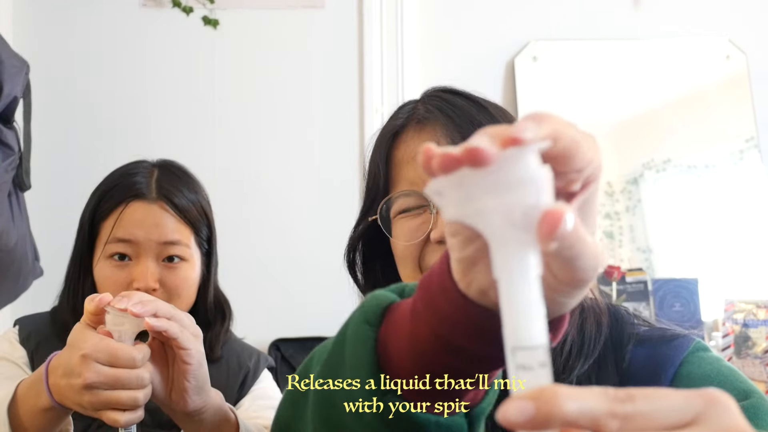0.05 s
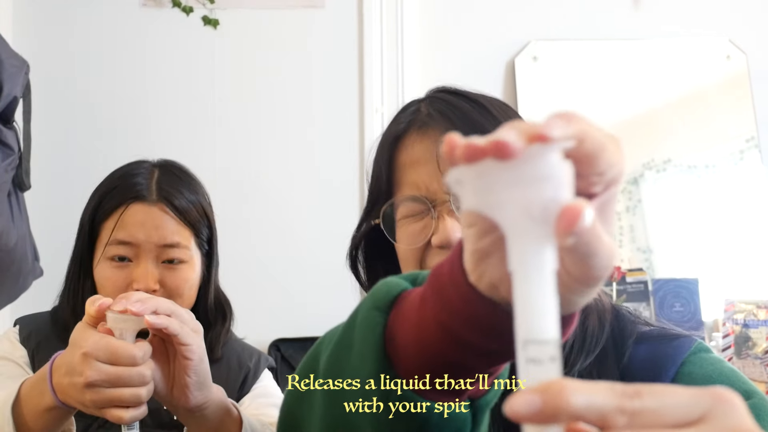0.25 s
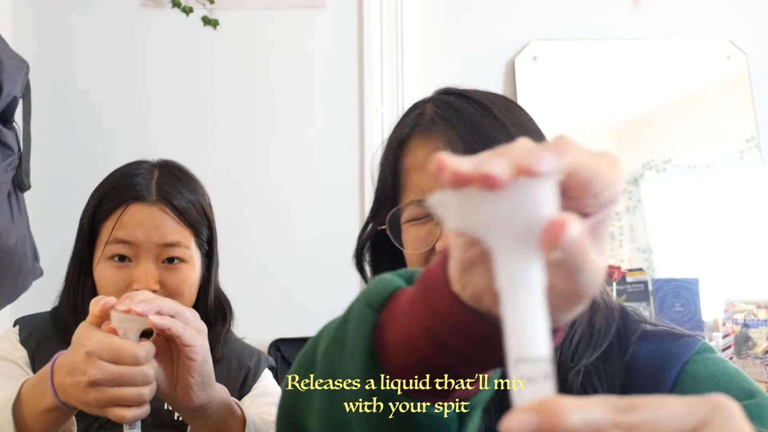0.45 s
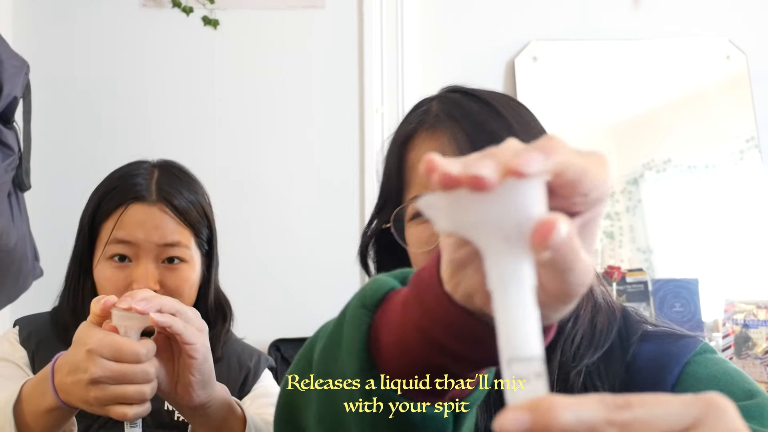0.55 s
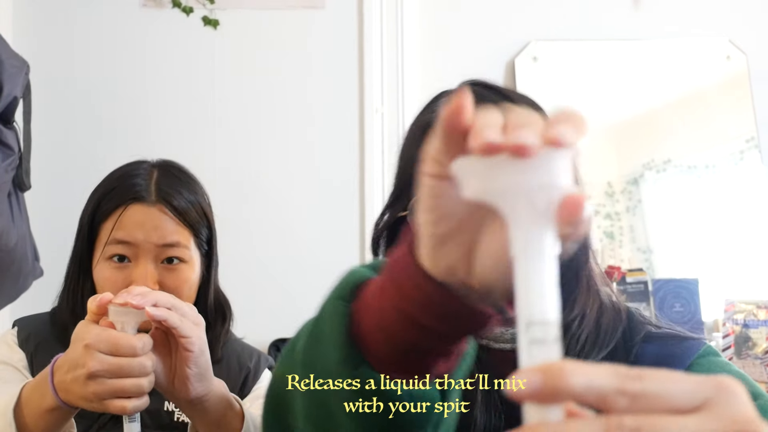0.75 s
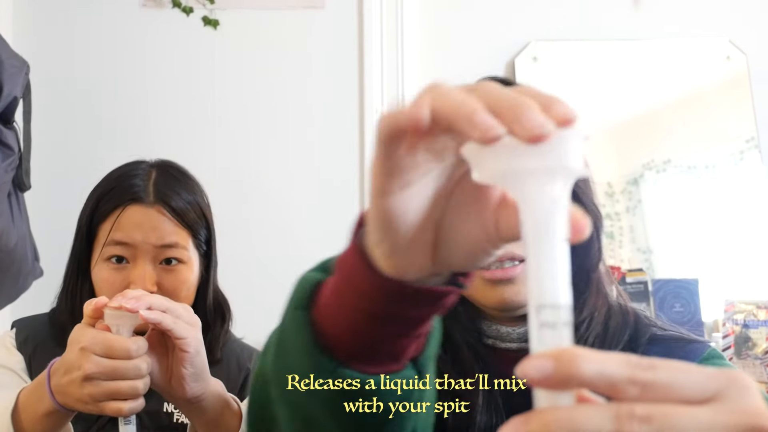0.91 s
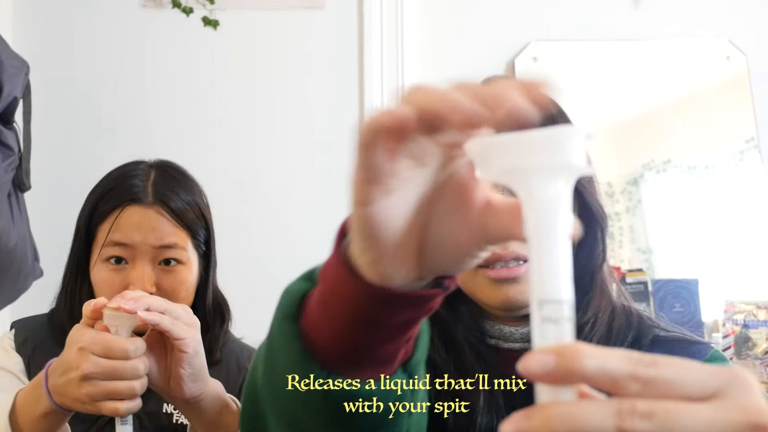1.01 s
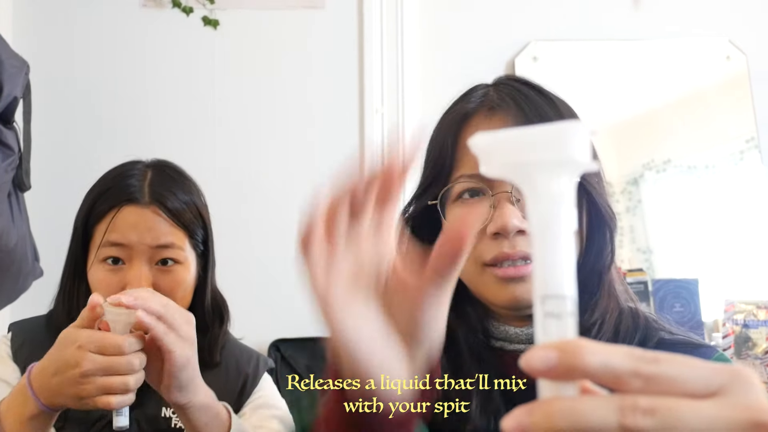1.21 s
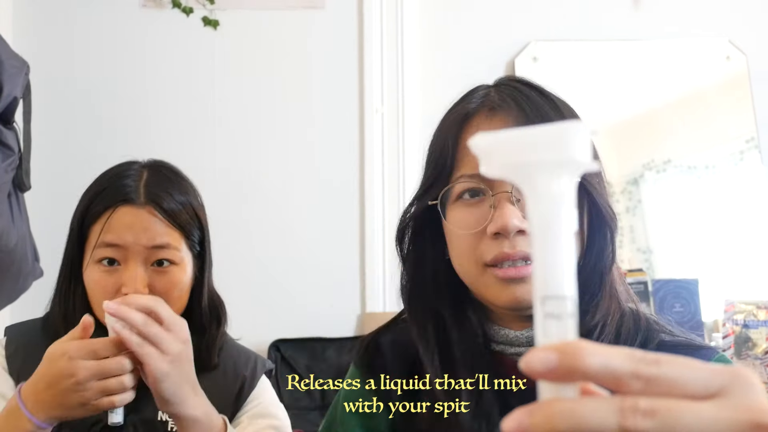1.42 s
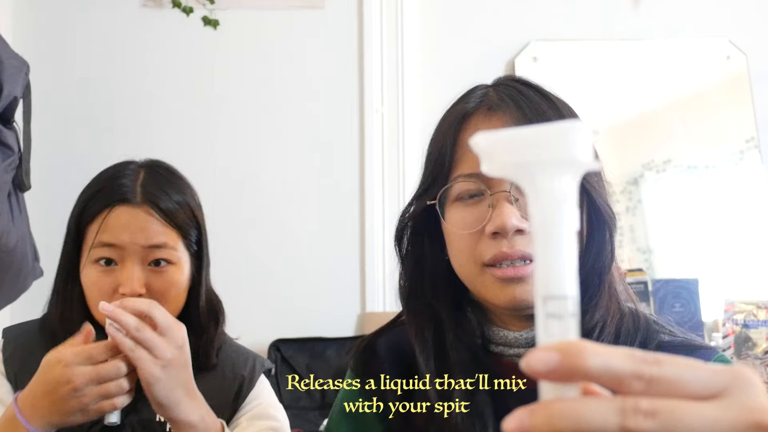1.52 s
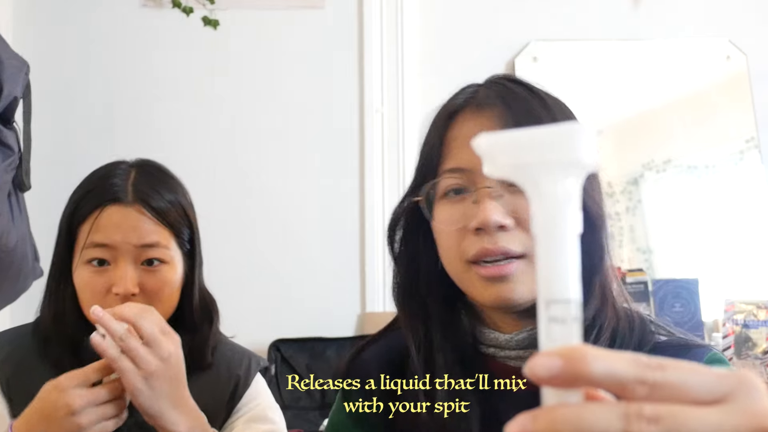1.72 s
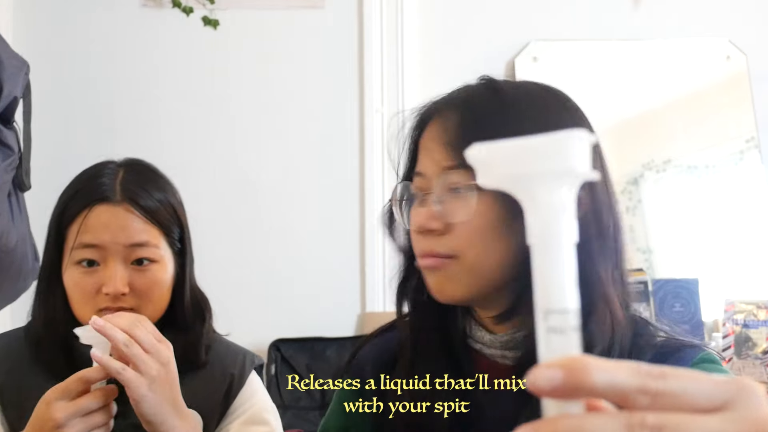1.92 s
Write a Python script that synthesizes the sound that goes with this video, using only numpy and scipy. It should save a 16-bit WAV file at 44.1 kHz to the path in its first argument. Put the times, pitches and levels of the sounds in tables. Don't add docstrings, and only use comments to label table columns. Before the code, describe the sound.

Two hard plastic snaps close together, the second louder, then faint finger rustles and a small click

```python
import sys
import numpy as np
from scipy import signal
from scipy.fft import rfft, irfft
from scipy.io import wavfile

SR = 44100
rng = np.random.default_rng(int(sys.argv[2]) if len(sys.argv) > 2 else 0)


def volts(x):
    e = np.asarray(x, float) / 20
    return 10 ** e


def master(y):
    cut = np.clip(np.atleast_2d(y).T, -1, 1)
    pcm = np.round(cut * 32767)
    wavfile.write(sys.argv[1], SR, pcm.astype(np.int16))


N = 85995


def read(points, hz):
    f, value = np.transpose(points)
    return np.interp(np.log(hz + 1), np.log(f + 1), value)


def evened(x):
    return x / np.sqrt(np.mean(x ** 2) + 1e-20)


def add(mix, s, sound):
    part = mix[..., round(s * SR):][..., :sound.shape[-1]]
    part += sound[..., :part.shape[-1]]


def left_right(pan_db):
    return np.array([[pan_db / 2], [-pan_db / 2]])


def pair(gain, same, size):
    a, b, c, d = rng.standard_normal((gain.shape[1], gain.shape[0], 4)).T
    same = np.clip(same, -1, 1)[:, None]
    left = a + 1j * b
    right = same * left + np.sqrt(1 - same ** 2) * (c + 1j * d)
    return signal.istft(gain * np.array([left, right]), nperseg=size, noverlap=size * 3 // 4)[1]


# pitch_hz, level_db (per Hz)
HISS_COLOUR = [(15, -41), (25, -11.5), (70, -10), (114, -3.5), (344, -6.5), (936, -7.5), (10100, -19),
               (14800, -25), (16000, -33.5)]
HISS_DB = -63.5
# pitch_hz, likeness (-1 to 1)
HISS_LIKENESS = [(60, 0.59), (240, 0.76), (950, -0.3), (3770, -0.02), (15000, 0.83)]
# time_s, level_db
GATE_OPENING = [(0, -2.5), (.2, -2.5), (.7, -8.5), (.9, -7), (1.1, -5), (1.25, -0.9), (1.6, -0.5),
                (1.95, 4.03)]
# pitch_hz, share (0 to 1)
GATE_SHARE = [(300, 0.36), (1500, .8), (5000, 0.72), (15000, .9)]


def hiss():
    hz, t = np.fft.rfftfreq(1024, 1 / SR), np.arange(N // 256 + 5) * 256 / SR
    gate_db = np.interp(t, *np.transpose(GATE_OPENING)) * read(GATE_SHARE, hz)[:, None]
    gain = volts(read(HISS_COLOUR, hz)[:, None] + gate_db)
    noise = pair(gain, read(HISS_LIKENESS, hz), size=1024)[:, :N]
    return volts(HISS_DB) * evened(noise)


PURR_PER_S, PURR_START_S, PUFF_LENGTH_S = 23.95, .002, .006
PURR_DB, PUFF_SPREAD_DB = -71, -0.5
# pitch_hz, level_db
PURR_COLOUR = [(80, -10.5), (160, 0), (260, -2.5), (480, -5.5), (800, -18), (1600, -16), (3000, -31)]


def purr():
    turns = (np.arange(N) / SR - PURR_START_S) * PURR_PER_S + 1
    u = turns % 1 / PURR_PER_S / PUFF_LENGTH_S
    sizes = volts(PUFF_SPREAD_DB * rng.standard_normal(60))[turns.astype(int)]
    puffs = u * np.exp(-u) * sizes * rng.standard_normal(N)
    colour = volts(read(PURR_COLOUR, np.fft.rfftfreq(N, 1 / SR)))
    return volts(PURR_DB) * evened(irfft(rfft(puffs) * colour, N))


# start_s, length_s, level_db, centre_hz
SLIDES = [
    (0.2, 0.007, -47.5, 2970),
    (1.211, 0.11, -71, 1310),
    (1.401, 0.09, -73, 1700),
    (1.529, 0.16, -69, 1732),
    (1.85, 0.062, -62.5, 9500),
]
RUSTLE_OCTAVES = 0.31


def rustles():
    out = np.zeros((2, N))
    hz = np.fft.rfftfreq(8192, 1 / SR)
    for s, length_s, level_db, centre_hz in SLIDES:
        noise = rng.standard_normal((2, 8192))
        colour = np.exp(-(np.log2((hz + 1) / centre_hz) / RUSTLE_OCTAVES) ** 2)
        u = np.linspace(0, 1, round(length_s * SR))
        swell = np.sin(np.pi * u ** 0.53)
        add(out, s, volts(level_db) * evened(irfft(rfft(noise) * colour))[:, :len(u)] * swell)
    return out


# start_s, level_db, left_minus_right_db, brightness_db_per_octave
LEFT_CRACKS = [
    (.2071, -24, 0, 0),
    (.2083, -2, 6, 1),
    (.2087, -3, 6, 1),
    (.2100, -3, 10, -2),
    (.2109, -7, 8, -4),
    (.2190, -14, 0, 0),
    (.2214, -14, -1.5, 1.5),
]
NEAR_CRACKS = [
    (.3680, -27, 0, 0),
    (.3689, -18, 0, 4),
    (.3701, 0, -2, 0),
    (.3705, -1, -1, 1),
    (.3714, -2, -2, 0),
    (.3719, 0, 0, 1),
    (.3723, -2, -3, -1),
]
CLICK_CRACKS = [
    (1.8405, -55, 7, -9.5),
    (1.8420, -52, 2, 0),
    (1.8512, -44.5, -3, -3),
    (1.8526, -43.5, -3, 5),
    (1.8540, -41, 2, 0.5),
    (1.8556, -44, 4, -4),
    (1.8582, -47, -5, -2),
    (1.8680, -48.5, -4, 1),
]
# pitch_hz, level_db, time_to_fade_60_db_s
LEFT_TONES = [(1310, -14.5, 0.01), (2080, -15.5, 0.022), (2870, -11, 0.0033), (3900, -7.5, .004),
              (4574, -7.5, .006), (5400, -12.5, 0.011), (6600, -8.5, 0.0055), (9400, -3.5, .004),
              (10903, -14, .0035), (13500, -14.5, .003)]
NEAR_TONES = [(1500, -10.5, 0.0043), (2289, -6, .004), (3300, -7.5, 0.0033), (4720, -0.5, .0035),
              (5860, -4.5, 0.0031), (7880, -11.5, 0.0092), (8800, -2, .0035), (10400, -2, 0.0036),
              (13000, -7.5, .003)]
CLICK_TONES = [(1495, -0.5, 0.0046), (2573, -1.3, 0.034), (3460, 5.5, 0.0025), (4610, -1, 0.0057),
               (6240, -1.5, 0.0031), (9600, -1.5, 0.0044), (12300, -6, 0.0044)]
EAR_TURN = 0.1


def lid(cracks, tones):
    out, t = np.zeros((2, N)), np.arange(3000) / SR
    hz, db, t60 = np.transpose(tones)[:, :, None]
    ears = np.array([1, -1])[:, None, None]
    chance = rng.random((len(cracks), 3, len(tones), 1))
    for (s, level_db, pan_db, bright_db), (bend, turn, skew) in zip(cracks, chance):
        fade = volts(db + bright_db * np.log2(hz / 5000) - 60 * t / t60)
        cycles = hz * (.96 + .08 * bend) * t + turn + EAR_TURN * (2 * skew - 1) * ears
        ring = (fade * np.sin(2 * np.pi * cycles)).sum(1)
        own_noise = np.diff(rng.standard_normal((2, len(t) + 1)))
        tick = (rng.standard_normal(len(t)) + 0.24 * own_noise) * volts(-8 - 60 * t / .004)
        onset = np.minimum(t / .00008, 1)
        add(out, s, volts(level_db - 3.5 + left_right(pan_db)) * (ring + tick) * onset)
    return out


# start_s, level_db, pitch_hz, time_to_fade_60_db_s
THUMPS = [
    (0.2087, -16, 1330, .016),
    (.2095, -21.5, 848, 0.0086),
    (.2100, -15, 545, .012),
    (.2108, -17, 270, 0.025),
    (.3716, -7.5, 700, .006),
    (.3719, -6.5, 420, 0.0082),
    (0.372, -13, 230, 0.011),
    (0.3726, -26, 160, .04),
]
KNOCKS = [
    (1.5505, -48, 245, .045),
    (1.5510, -55, 150, .06),
    (1.5515, -56, 600, .015),
    (1.8427, -41, 430, .008),
    (1.8428, -49, 200, .03),
    (1.8822, -51, 330, .02),
]


def thumps():
    out, t = np.zeros(N), np.arange(6000) / SR
    for s, level_db, hz, t60 in [*THUMPS, *KNOCKS]:
        add(out, s, -volts(level_db - 60 * t / t60) * np.sin(2 * np.pi * hz * t))
    return out


# delay_s, level_db, left_minus_right_db
WALL_ECHOES = [(.0045, -17, .5), (.0072, -14, 2.5), (.0110, -17, -6.5), (.0140, -11, 1.5),
               (.0195, -16.5, -2), (0.03, -13.5, 0.5)]
# pitch_hz, time_to_fade_60_db_s
ROOM_FADE = [(100, 0.33), (250, 0.37), (600, 0.41), (1500, 0.42), (4000, 0.42), (8000, 0.36), (12000, .36),
             (16000, 0.26)]
# pitch_hz, level_db
ROOM_COLOUR = [(100, -13), (300, -3), (800, -2), (1800, 4), (3200, -2.4), (5000, 1.53), (10000, -0.66),
               (16000, -14)]
# pitch_hz, likeness (-1 to 1)
ROOM_LIKENESS = [(150, .99), (350, 0.78), (950, .13), (3770, 0.19), (15000, 1)]
# start_s, broad_burst_db, ringing_lid_db, wall_echoes_db
ROOM_SENDS = [
    (0.2084, 7.5, -8.5, -6.5),
    (.3710, 9, -18.5, -10.5),
    (1.8524, -32, -11.5, 0),
]
BUILD_S, ROOM_THUMP_DB = 0.015, -8


def room(lids, low):
    hz, t = np.fft.rfftfreq(256, 1 / SR), np.arange(500) * 64 / SR
    gain = volts(read(ROOM_COLOUR, hz)[:, None] - 60 * t / read(ROOM_FADE, hz)[:, None])
    out = np.zeros((2, N))
    for k, (x, (start, burst_db, ring_db, echo_db)) in enumerate(zip(lids, ROOM_SENDS)):
        tail = pair(gain, read(ROOM_LIKENESS, hz), size=256)
        tail = tail * (1 - np.exp(-(np.arange(tail.shape[1]) / SR / BUILD_S) ** 2))
        tail = tail / np.sqrt((tail ** 2).sum() / 2)
        add(out, start, volts(burst_db) * tail)
        sent = volts(ring_db) * x.mean(0)[None]
        if k == 0:
            sent = sent + volts(ROOM_THUMP_DB) * low
        out += signal.fftconvolve(sent, tail, axes=1)[:, :N]
        for s, db, pan_db in WALL_ECHOES:
            add(out, s, x * volts(db + echo_db + left_right(pan_db)))
    return out


def scene():
    lids = [lid(LEFT_CRACKS, LEFT_TONES), lid(NEAR_CRACKS, NEAR_TONES), lid(CLICK_CRACKS, CLICK_TONES)]
    low = thumps()
    near = sum(lids) + low + room(lids, low)
    low_cut = signal.butter(N=4, Wn=160, btype="high", fs=SR, output="sos")
    return signal.sosfilt(low_cut, near) + hiss() + purr() + rustles()


def roll_off(x):
    return signal.sosfilt(signal.butter(12, 16380, fs=SR, output="sos"), x)


NOTCH_HZ, NOTCH_WIDTH_HZ, NOTCH_SHARE = 7900, 350, 0.37
TOP_HZ, TOP_STEEPNESS = 15450, 160
LIMIT_DB, SQUEEZE, RECOVER_DB_PER_S, GRIP_S = -17, 0.16, 251.5, 0.0048


def record(dry):
    hz = np.fft.rfftfreq(N, 1 / SR)
    notch = 1 - NOTCH_SHARE / (1 + (2 * (hz - NOTCH_HZ) / NOTCH_WIDTH_HZ) ** 2)
    treble_limit = np.sqrt(1 + (hz / TOP_HZ) ** TOP_STEEPNESS)
    x = irfft(rfft(dry) * notch / treble_limit, N)
    keep = np.exp(-1 / (GRIP_S * SR))
    power = signal.lfilter([1 - keep], [1, -keep], (x ** 2).mean(0))
    power_db = 10 * np.log10(power + 1e-12)
    fall = np.arange(N) * RECOVER_DB_PER_S / SR
    held_db = np.maximum.accumulate(power_db + fall) - fall
    over_db = np.maximum(held_db - LIMIT_DB, 0)
    ducked = x / volts(SQUEEZE * signal.lfilter([1 - keep], [1, -keep], over_db))
    return roll_off(np.clip(ducked, -1, 1))


dry = scene()
out = record(dry)
master(out)
```